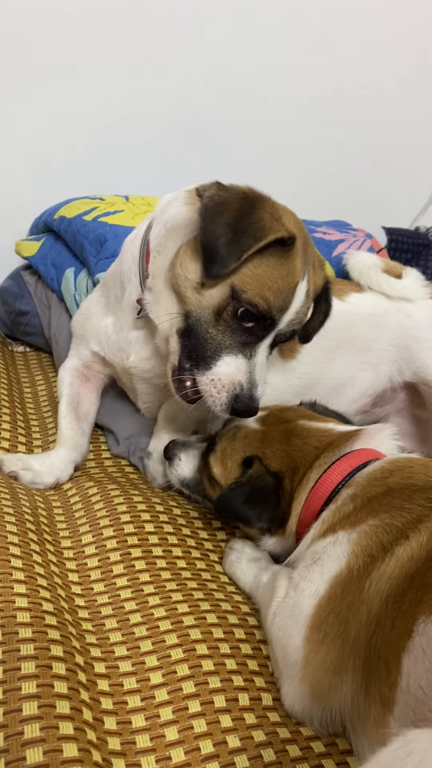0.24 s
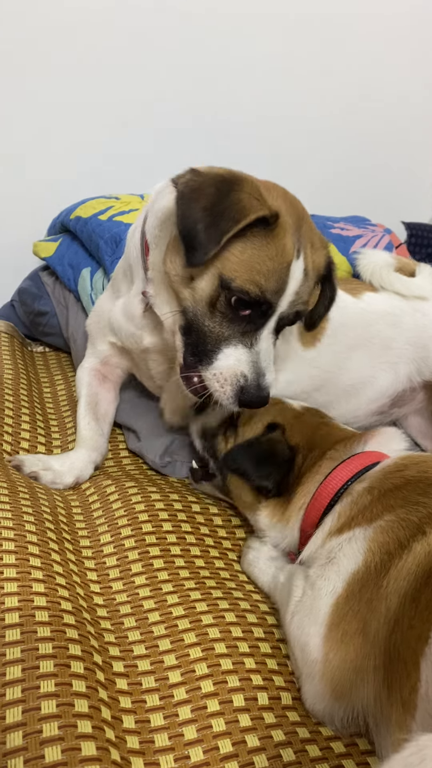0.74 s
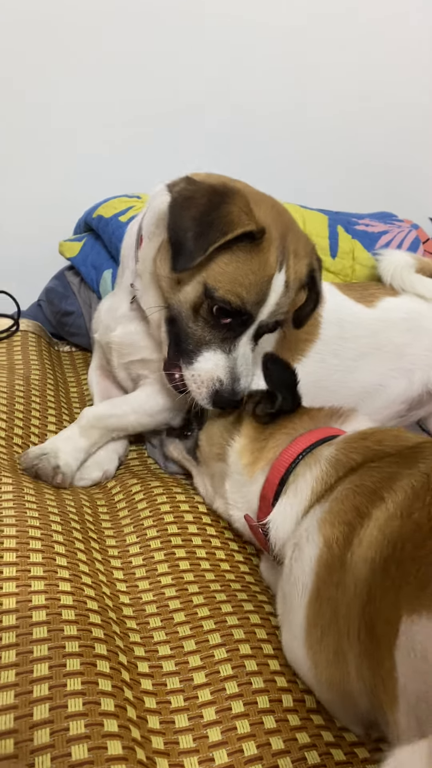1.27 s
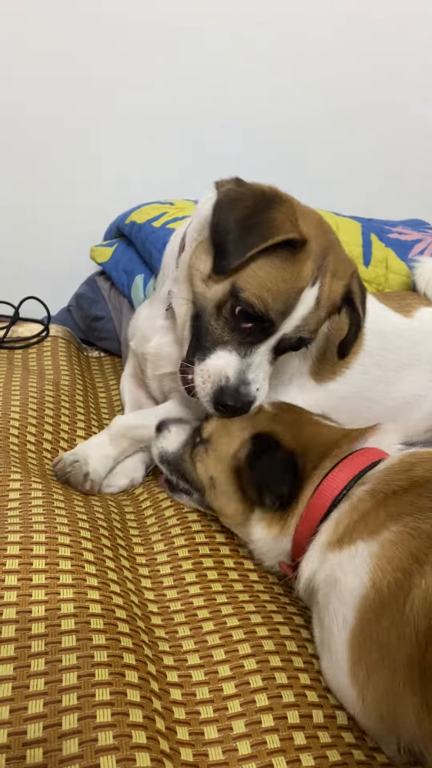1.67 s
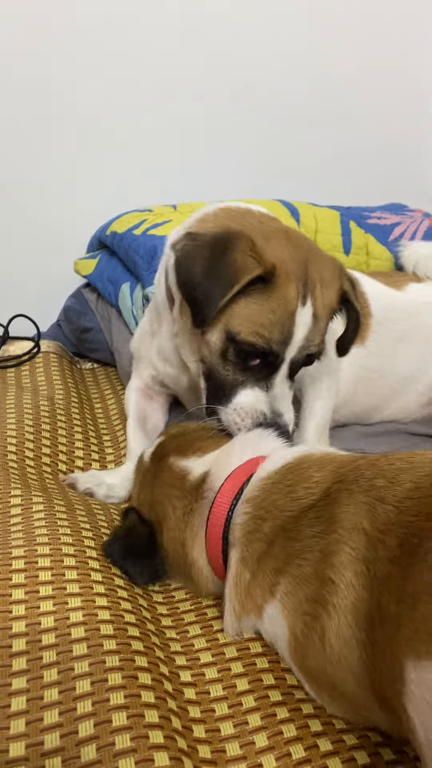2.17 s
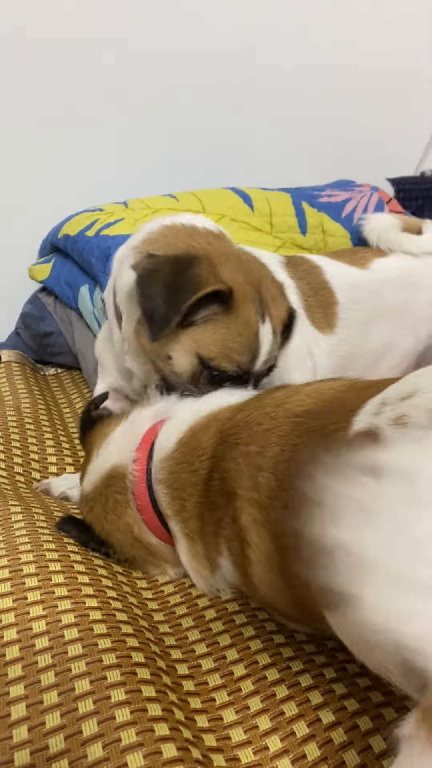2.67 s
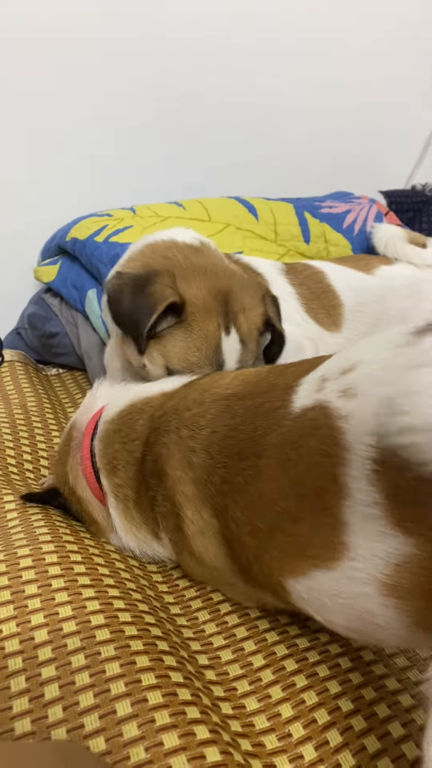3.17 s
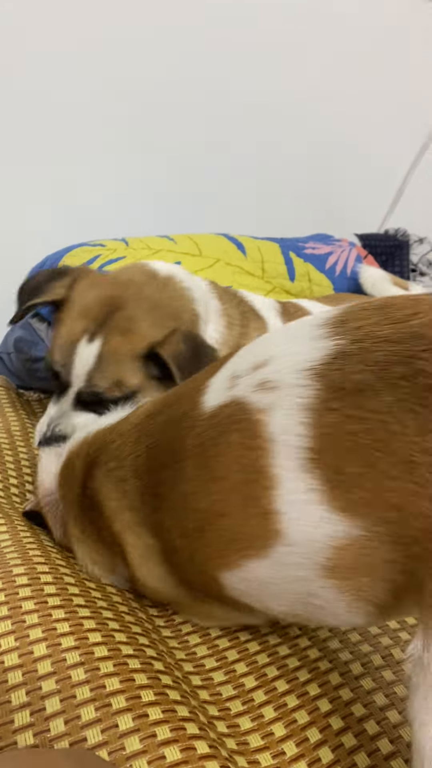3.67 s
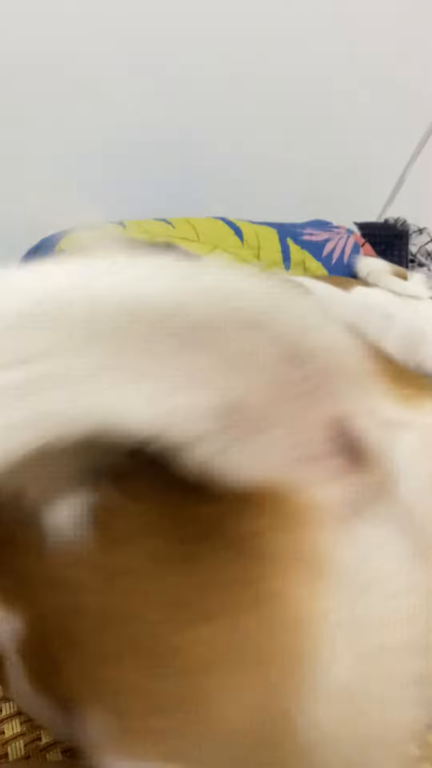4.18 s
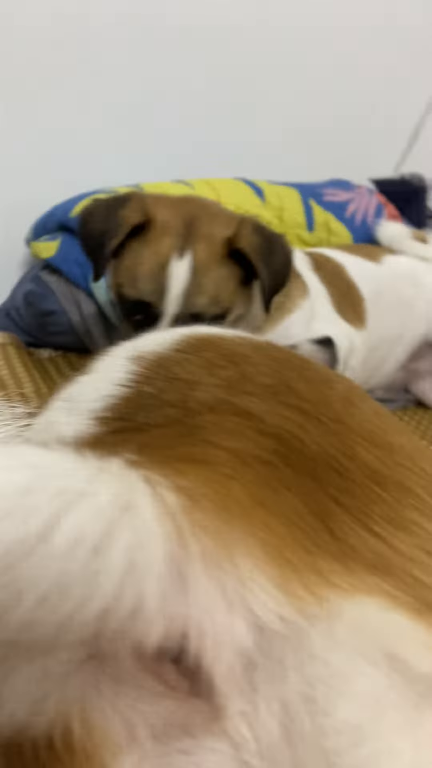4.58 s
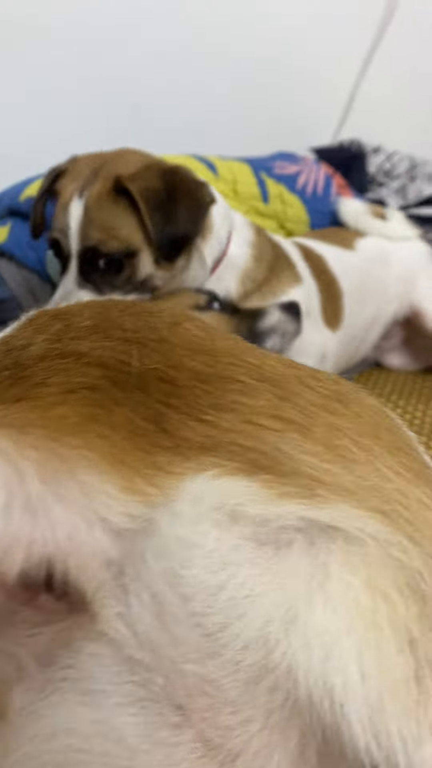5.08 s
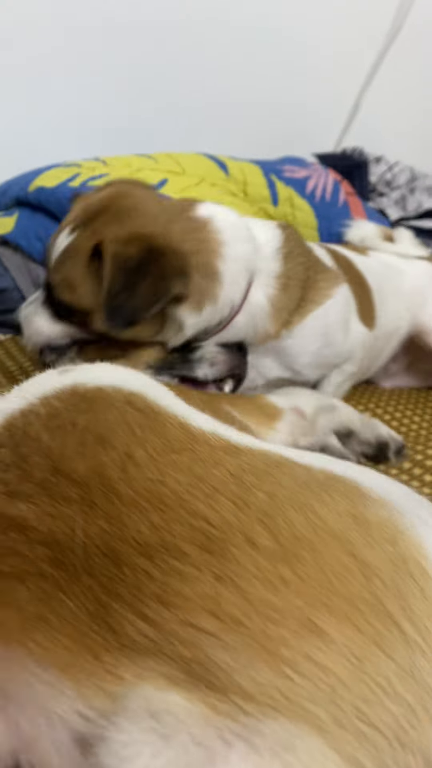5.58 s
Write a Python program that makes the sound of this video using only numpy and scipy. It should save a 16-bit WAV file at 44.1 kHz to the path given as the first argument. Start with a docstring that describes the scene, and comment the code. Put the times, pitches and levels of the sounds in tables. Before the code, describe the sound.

A close stereo scene in a small room: two little dogs wrestle on a bed covered by a woven mat, with a faint fan rush and wavering motor whine behind, the whine sinking away after 3 s. From 0 to 1.2 s come short, breathy huffs and fluttering snorts, strongest near 0.75 s, among dull mattress bumps. At 1.6 s a firm low thump lands with a dry clack and scuff. Two raspy snarls with low, muffled growls follow, at about 2.0-2.1 s and a sharper, snort-broken one at 2.3-2.4 s, then a small huff at 2.6 s. A weak growl murmurs near 3.1 s amid brushing fur and soft scrapes. Slaps at 4.0 s lead to the loudest event at 4.2-4.3 s: deep body thumps, a hard slap and rough scrape, then a brief woody creak at 4.4 s. Faint nose air, light pats and a snorting huff at 5.4 s close it.

```python
"""Dogs play-fighting on a bed

Two small dogs scuffle on a bed with a woven mat, in a small room, close to the microphone.
Huffs, snorts and snarls are noise through resonances of mouth and muzzle; growls are vocal-fold pulses.
Paws and bodies thud as swung pulses and ringing modes; mat, fur and bedding scuff as filtered noise.
The frame creaks and knocks, the mattress rumbles, and a fan of noise and wavering tones hums behind."""
import sys
import numpy as np
from scipy import signal
from scipy.fft import rfft, irfft
from scipy.io import wavfile

SR = 44100
rng = np.random.default_rng(int(sys.argv[2]) if len(sys.argv) > 2 else 0)


def transcribe(signal):
    """Save signal, clipped to [-1, 1], as a 16-bit WAV file at the path in sys.argv[1]."""
    frames = np.atleast_2d(signal).T
    limited = np.clip(frames, -1, 1)
    pcm = np.round(limited * 32767).astype(np.int16)
    wavfile.write(sys.argv[1], SR, pcm)


N = 257544
TIME, BINS = np.arange(N) / SR, np.fft.rfftfreq(N, 1 / SR)
LEAD_S = 0.04  # time from the start of a burst to its crest

# resonances of the muzzle: (frequency [Hz], width [Hz], level [dB])
MUZZLE_MODES = [(658, 58, 0), (940, 110, -3.5), (1286, 120, -2.5), (1840, 220, -7.5), (2195, 133, -4.5),
                (2830, 260, -17), (3410, 490, -20)]
# hiss resonances of the nostrils: (frequency [Hz], width [Hz], level [dB])
NOSE_MODES = [(5030, 880, 9.5), (5770, 370, -2), (8250, 1250, 3.5)]
# spectrum of a scrape on the mat: (frequency [Hz], density [dB per Hz])
SCRAPE_SPECTRUM = [(150, 4.5), (330, 4), (650, 6.5), (1100, -4.5), (2200, -9.5), (3500, -19), (7000, -26)]
# spectrum of the bright fizz of the weave: (frequency [Hz], density [dB per Hz])
FIZZ_SPECTRUM = [(800, -34), (2500, -27), (4000, 4), (5500, 5), (7000, 5), (10000, 3), (13000, -5),
                 (16000, -10)]
# stereo likeness of the room and the mattress: (frequency [Hz], left-right likeness [-1 to 1])
ROOM_LIKENESS = [(50, 0.94), (120, 0), (250, 0.43), (700, 0), (1500, 0.53), (3000, 0.41), (6000, 1)]


def amp(db):
    """Decibels to gain."""
    return 10 ** (np.asarray(db) / 20)


def unit(x):
    """Scales to rms 1."""
    return x / np.sqrt(np.mean(x ** 2) + 1e-20)


def read(points, hz):
    """Reads a table on a log-frequency axis."""
    f, value = np.transpose(points)
    return np.interp(np.log(hz + 1), np.log(f + 1), value)


def colour(x, spectrum):
    """Filters by a spectrum in dB, to rms 1."""
    return unit(irfft(rfft(x) * amp(read(spectrum, BINS)), N))


def band(x, low_hz, high_hz):
    """Causal band-pass, to rms 1."""
    edges = [low_hz, min(high_hz, 0.45 * SR)]
    return unit(signal.sosfilt(signal.butter(2, edges, "band", fs=SR, output="sos"), x))


def noise():
    """White noise for the whole scene."""
    return rng.standard_normal(N)


def wander(rate_hz):
    """Random motion of rms 1, mostly slower than rate_hz."""
    return unit(irfft(rfft(noise()) * np.exp(-(BINS / rate_hz) ** 2), N))


def add(mix, s, sound):
    """Mixes a sound in at time s."""
    part = mix[max(round(s * SR), 0):][:len(sound)]
    part += sound[:len(part)]


def swell(t, peak_s):
    """Rises to 1 at peak_s and dies away."""
    u = np.maximum(t, 0) / peak_s
    return u * np.exp(1 - u)


def arch(t, rise_s, fade_s):
    """A smooth bell with its crest of 1 at t = 0 and separate rise and fade."""
    return np.exp(-np.minimum((t / np.where(t < 0, rise_s, fade_s)) ** 2, 60))


def ring(modes, t):
    """Sum of dying sine modes."""
    return sum(amp(db - 60 * t / t60) * np.sin(2 * np.pi * hz * t) for hz, db, t60 in modes)


def strike(modes, t):
    """A body's answer to one tap, with peak 1."""
    answer = ring(modes, t)
    return answer / abs(answer).max()


def cavity(modes, hz):
    """Gain of a set of steep resonances."""
    return sum(amp(db) / (1 + (2 * (hz - centre) / width) ** 2) for centre, width, db in modes)


def resonate(x, hz, width_hz):
    """A steep resonance that follows the curve hz, to rms 1."""
    turn = np.exp(2j * np.pi * np.cumsum(hz) / SR)
    r = np.exp(-np.pi * width_hz / SR)
    # shift the resonance down to 0 Hz, smooth there, shift back
    smoothed = signal.lfilter([1], [1, -2 * r, r * r], x / turn)
    return unit((turn * smoothed).real)


def burst(gain, rise_s, fade_s):
    """A short puff of noise with the spectrum gain(hz), scaled to rms 1 at its crest, LEAD_S after its start."""
    t = TIME[:4096]
    shape = arch(t - LEAD_S, rise_s, fade_s)
    hiss = irfft(rfft(rng.standard_normal(len(t))) * gain(np.fft.rfftfreq(len(t), 1 / SR)))
    puff = shape * hiss
    return puff * np.linalg.norm(shape) / np.linalg.norm(puff)


def pair(a, b, likeness):
    """Two unrelated sounds become a left and a right that are partly alike."""
    same = np.clip(read(likeness, BINS), -1, 1)
    mid = rfft(a, N) * np.sqrt((1 + same) / 2)
    side = rfft(b, N) * np.sqrt((1 - same) / 2)
    return irfft([mid + side, mid - side], N)


def room_response():
    """Sparse reflections of a small room, each band dying at its own speed."""
    # decay of the room: (frequency [Hz], t60 [s])
    decay = [(60, 0.44), (150, 0.18), (500, 0.27), (2000, 0.24), (5000, 0.17), (12000, 0.16)]
    size = SR // 2
    taps = rng.choice([-1., 1.], (2, size)) * (rng.random((2, size)) < 4000 / SR)  # 4000 per second
    hz, t, z = signal.stft(taps, SR, nperseg=256)
    faded = z * amp(-60 * t / read(decay, hz)[:, None])
    tail = signal.istft(faded, SR, nperseg=256)[1][:, :size]
    tail = tail * np.clip(TIME[:size] / 0.005 - 0.5, 0, 1)  # silent for the first 2.5 ms
    return pair(*tail / np.linalg.norm(tail[0]), ROOM_LIKENESS)[:, :size]


def place(x, room, wet_db, pan_db=None):
    """Direct sound, centred or leaning to one side, plus the room."""
    lean = 1 if pan_db is None else amp([[pan_db / 2], [-pan_db / 2]])
    return x * lean + amp(wet_db) * signal.fftconvolve(x[None], room, axes=1)[:, :N]


def fan(rush_db=-41.5, tone_trim_db=4.0, waver=0.00456, whirr_db=-57, hiss_db=-68):
    """Steady rush of air with a hollow drone, a wavering motor whine and a thin hiss."""
    # spectrum of the rush: (frequency [Hz], density [dB per Hz])
    rush_spectrum = [(15, -54), (25, -7.5), (55, -11.5), (86, -4.5), (129, -14), (233, -5), (359, -7.5),
                     (919, -16.5), (1110, -17), (1240, -22.5), (5010, -37.5), (6550, -41), (7300, -53),
                     (9050, -38), (15500, -126)]
    # stereo likeness of the rush: (frequency [Hz], left-right likeness [-1 to 1])
    rush_likeness = [(40, 0.67), (100, -0.44), (200, -0.87), (450, -1.11), (750, 0.14), (1100, -0.67),
                     (1600, 0.22), (2200, 0.41), (3000, 0.077), (5000, 1), (8000, 1)]
    # hollow drone bands: (centre [Hz], width [Hz], level [dB])
    drone_bands = [(350, 58, -55.5), (740, 91, -61.5)]
    # motor whine: (frequency [Hz], level [dB before the trim])
    whine_tones = [(985.1, -62.5), (1109, -64)]
    sink_after_s, sink_db_per_s = 3, 5.5

    rush = pair(colour(noise(), rush_spectrum), colour(noise(), rush_spectrum), rush_likeness)
    drone = sum(amp(db) * band(noise(), hz - width / 2, hz + width / 2) for hz, width, db in drone_bands)
    tones = 0
    for hz, db in whine_tones:
        turns = np.cumsum(hz * (1 + waver * wander(28.9))) / SR
        tones = tones + amp(db) * unit(np.sin(2 * np.pi * turns))
    whirr = band(noise(), 945, 1350)  # rush of air around the whine
    whine = amp(tone_trim_db) * tones + amp(whirr_db) * whirr
    whine = whine * amp(-sink_db_per_s * np.maximum(TIME - sink_after_s, 0))
    return amp(rush_db) * rush + drone + whine + amp(hiss_db) * band(noise(), 9400, 14100)


def heave(trim_db=2, lumps_db=6.0):
    """Lumpy low rumble of the mattress under shifting weight."""
    # how hard the mattress heaves: (time [s], level [dB before trim and lumps])
    effort_curve = [(0.0, -31.5), (0.1, -36), (0.8, -38.5), (1.19, -40.5), (1.55, -36), (1.64, -28.5),
                    (1.76, -37.5), (2.44, -39), (2.8, -47.5), (3.1, -40), (3.27, -41), (3.5, -33.5),
                    (3.65, -43), (4.1, -38), (4.33, -29.5), (4.75, -43.5), (5.32, -44.5), (5.84, -40)]
    # spectrum of the mattress: (frequency [Hz], density [dB per Hz])
    mattress_spectrum = [(15, -12), (30, -6), (55, 2), (75, 2), (95, -2.5), (125, 5.5), (160, -4.5),
                         (220, -14.5), (400, -19), (900, -74)]
    rumble = pair(colour(noise(), mattress_spectrum), colour(noise(), mattress_spectrum), ROOM_LIKENESS)
    lumps = lumps_db * np.tanh(wander(5.3))
    return amp(trim_db + np.interp(TIME, *np.transpose(effort_curve)) + lumps) * rumble


def fur(swing_db=1.5, swing_hz=9):
    """The two coats brush against each other in a smooth, soft rush."""
    # how hard the coats rub: (time [s], level [dB before the swing])
    rubbing = [(0, -59.5), (2.3, -56.5), (2.7, -56), (3.7, -57), (4.7, -57.5), (5.3, -60), (5.84, -59)]
    # coat brushing on coat: (frequency [Hz], width [Hz], level [dB])
    coat_modes = [(1563, 560, 2.5), (2410, 1140, -0.5)]
    level_db = np.interp(TIME, *np.transpose(rubbing)) + swing_db * wander(swing_hz)
    return amp(level_db) * unit(irfft(rfft(noise()) * cavity(coat_modes, BINS), N))


def rustles(rustle_db=-55, spread_db=3, width_share=0.58, bouts_db=3, bouts_hz=5):
    """Fur, collars and bedding rub here and there in loose bouts, each time at another pitch."""
    rubs_per_s, pitch_range_hz, fade_range_s = 30, (340, 815), (0.012, 0.031)
    out = np.zeros(N)
    rubs = rng.random(size=(400, 4))[:round(rubs_per_s * N / SR)]
    for when, pitch, length, strength in rubs:
        centre = np.exp(np.interp(pitch, [0, 1], np.log(pitch_range_hz)))
        fade_s = np.interp(length ** 2, [0, 1], fade_range_s)  # squared: mostly short
        rub = burst(lambda hz: cavity([(centre, width_share * centre, 0)], hz), fade_s / 2, fade_s)
        level_db = rustle_db + spread_db * (2 * strength - pitch)  # higher rubs are softer
        add(out, when * N / SR - LEAD_S, amp(level_db) * rub)
    return out * amp(bouts_db * np.tanh(wander(bouts_hz)))


def slides(scrape_trim_db=-14, fizz_trim_db=-12, stir_db=-56, stir_swing_db=4, slips_per_s=3500, spread_db=3.0):
    """Fur and claws catch on the weave in a dense run of tiny slips; the dogs never lie quite still."""
    # slides over the mat; the first row is the soft swell of the opening huff:
    # (crest [s], level [dB before trim], fizz re the scrape [dB before trim], half length [s])
    strokes = [(0.082, -38, -25, 0.031), (0.76, -35, -28, 0.026), (1.568, -33.5, -6, 0.035),
               (2.665, -64, 13, 0.076), (2.93, -43, -35, 0.032), (3.095, -41, -32, 0.063),
               (3.467, -39.5, -30, 0.067), (4.013, -24.5, -37, 0.052), (4.062, -51.5, 8, 0.038),
               (4.099, -47, 13.5, .002), (4.157, -51.5, 9, .022), (4.22, -39, -42, 0.019),
               (4.245, -39, -3, 0.014), (4.265, -18.5, -19, 0.013), (4.398, -29, -10.5, 0.066),
               (5.083, -42.5, -8, 0.057), (5.306, -35.5, -41, .04), (5.48, -53.5, 3.5, 0.16),
               (5.684, -45, -37, 0.034)]
    strength = amp(spread_db * np.minimum(rng.exponential(1, N), 4))
    slips = noise() * (rng.random(N) < slips_per_s / SR) * strength
    scrape, fizz = np.zeros(N), np.zeros(N)
    for s, db, treble_db, half_s in strokes:
        stroke = amp(db) * arch(TIME - s, half_s, half_s)
        scrape += amp(scrape_trim_db) * stroke
        fizz += amp(treble_db + fizz_trim_db) * stroke
    stir = amp(stir_db + stir_swing_db * wander(47))
    rough = (scrape + stir) * colour(slips, SCRAPE_SPECTRUM)
    return rough + fizz * colour(unit(slips) + noise(), FIZZ_SPECTRUM)


def creaks(grit_db=-20, slip_s=0.00092):
    """The frame catches and lets go: a few hard slips ring the wood, then small ones chatter."""
    # hard slips of the frame: (time [s], level [dB])
    hard_slips = [(4.373, -22), (4.3762, -17), (4.389, -26)]
    # modes of the frame: (frequency [Hz], level [dB], t60 [s])
    frame_modes = [(1620, 0, .035), (1880, 1, .042), (2010, -5, .025), (2630, -9, .022)]
    # where the chatter is strongest: (frequency [Hz], width [Hz], level [dB])
    chatter_modes = [(1850, 390, -1.5), (2640, 400, -7), (3300, 420, -5)]
    chatter_per_s, chatter_db, chatter_rise_s, chatter_fade_s = 1200, -39.5, 0.013, 0.06

    out, t = np.zeros(N), TIME[:SR // 5]
    wood = strike(frame_modes, t) * (1 - np.exp(-t / slip_s))
    for s, db in hard_slips:
        grit = amp(grit_db) * swell(t, slip_s) * rng.standard_normal(len(t))
        add(out, s, amp(db) * (wood + grit))
    small_slips = noise() * (rng.random(N) < chatter_per_s / SR)
    chatter = unit(irfft(rfft(small_slips) * cavity(chatter_modes, BINS), N))
    since = np.maximum(TIME - hard_slips[0][0], 0)
    weakening = np.minimum(since / chatter_rise_s, 1) * np.exp(-since / chatter_fade_s)
    return out + amp(chatter_db) * weakening * chatter


def knocks(rise_s=0.0012, fade_s=0.0015):
    """Hard parts of the bed clack together without ringing."""
    # clacks: (crest [s], level [dB])
    clacks = [(1.597, -34.5), (1.6065, -29.5), (1.6092, -28)]
    # spectrum of a clack: (frequency [Hz], density [dB per Hz])
    clack_spectrum = [(300, -25), (700, -19), (1500, -3), (2250, 4.5), (2800, -12.5), (6000, -20),
                      (12000, -22)]
    out = np.zeros(N)
    for s, db in clacks:
        clack = burst(lambda hz: amp(read(clack_spectrum, hz)), rise_s, fade_s)
        add(out, s - LEAD_S, amp(db) * clack)
    return out


def slaps(pat_db=-3, scuff_db=-12, scuff_s=0.003, tick_db=-27, tick_s=0.0017):
    """A dull pat of the pad, a short scuff and a dry tick of the woven strips."""
    # claws and paws slapping the mat: (time [s], level [dB before the trim of each part])
    hits = [(0.376, -34), (1.577, -30), (3.981, -23.5), (4.049, -21), (4.273, -11.5), (4.277, -26),
            (4.379, -19.5), (4.913, -29.5), (5.271, -31), (5.461, -29), (5.594, -25.5)]
    # what mat and padding ring with under a paw: (frequency [Hz], level [dB], t60 [s])
    mat_modes = [(190, -1.5, 0.043), (323, 2.5, 0.084), (555, 6.5, 0.034), (890, 6, 0.0053),
                 (1700, 7, 0.003)]
    pats, mat = np.zeros(N), strike(mat_modes, TIME[:SR // 20])
    for s, db in hits:
        add(pats, s, amp(db + pat_db) * mat)
    scuff = sum(amp(db + scuff_db) * swell(TIME - s, scuff_s) for s, db in hits)
    tick = sum(amp(db + tick_db) * swell(TIME - s, tick_s) for s, db in hits)
    return pats + scuff * colour(noise(), SCRAPE_SPECTRUM) + tick * colour(noise(), FIZZ_SPECTRUM)


def press(db, hz, cycles, overtone=2.1, stiffening=0.44):
    """One push into the mattress; the padding stiffens when pressed hard, so heavy ones gain an overtone."""
    t = TIME[:SR // 2]
    force = amp(db) * swell(t, cycles / hz)
    turn = 2 * np.pi * hz * t
    return force * (np.sin(turn) + stiffening * force * np.sin(overtone * turn))


def thumps(puff_db=-20, puff_s=0.0061, ring_db=-6):
    """Each landing pushes the mattress, puffs the cloth and sets the bed swinging; then the weight settles."""
    # landings of paws and bodies: (time [s], level [dB], pitch [Hz], settling weight re the landing [dB])
    landings = [(0.124, -20.5, 75, -9), (0.137, -21.5, 141, -23), (0.413, -21, 83, -27),
                (0.452, -20.5, 91, -18), (0.662, -20, 85, -7), (0.687, -23.5, 133, 5.5),
                (0.733, -21.5, 130, -15), (1.582, -18.5, 227, -33), (1.588, -10.5, 82, -6),
                (1.59, -15.5, 366, -27), (1.598, -15.5, 159, -30), (1.669, -16.5, 77, -24),
                (2.051, -21.5, 134, -16), (2.57, -20.5, 150, -35), (2.579, -21.5, 90, -32),
                (3.466, -22, 136, -1), (3.502, -18, 141, -36), (4.194, -9, 82, -9), (4.197, -19, 378, -30),
                (4.209, -23, 476, -30), (4.204, -11.5, 149, -28), (4.216, -10, 65, -6),
                (4.386, -23.5, 129, -5), (4.398, -23, 80, -12), (4.408, -20.5, 392, -30),
                (4.916, -26, 128, -6.5), (5.529, -25, 71.6, -28), (5.61, -18, 268, -35),
                (5.719, -26, 246, -24)]
    # what the bed swings with: (frequency [Hz], level [dB], t60 [s])
    bed_modes = [(69, 33, 0.24), (110, 15, 0.22), (158, 36, 0.24), (204, 19, 0.1), (339, 26, .2),
                 (393.5, 34.5, 0.3)]
    landing_cycles = 0.45  # the push crests after this part of a cycle
    settle_s, settle_hz, settle_cycles = 0.06, 69.8, 0.65  # the weight sinks in just after the paws

    push, puff = np.zeros(N), np.zeros(N)
    for s, db, hz, settle_db in landings:
        add(push, s, press(db, hz, landing_cycles))
        add(push, s + settle_s, press(db + settle_db, settle_hz, settle_cycles))
        add(puff, s, amp(db) * swell(TIME[:SR // 2], puff_s))
    cloth = band(band(noise(), 140, 424), 140, 424)  # twice, for steeper slopes
    blow = push + amp(puff_db) * puff * cloth
    bed = ring(bed_modes, TIME[:2 * SR])
    swing = signal.fftconvolve(blow, bed / abs(rfft(bed)).max())[:N]
    return blow + amp(ring_db) * swing


def growls(trim_db=-3.5, jitter=0.2547, shimmer_db=2.5):
    """Uneven pulses of the vocal folds, rising in pitch and muffled by a nearly shut mouth."""
    # low growls: (crest [s], level [dB before trim], pitch at the crest before jitter [Hz])
    voicings = [(2.085, -27, 120), (2.357, -27.5, 112), (3.085, -34.5, 153)]
    rise_s, fade_s, glide_octaves_per_s = 0.03, 0.036, 2.5
    out, unsteady = np.zeros(N), 1 + jitter * wander(86.8)
    for s, db, hz in voicings:
        pitch = hz * 2 ** (glide_octaves_per_s * np.clip(TIME - s, -rise_s, fade_s))
        turns = np.cumsum(pitch * unsteady) / SR
        # only three harmonics, falling steeply: the muffling
        folds = sum(np.cos(2 * np.pi * k * turns) / k ** 1.57 for k in range(1, 4))
        out += amp(db + trim_db) * arch(TIME - s, rise_s, fade_s) * unit(folds)
    return out * unit(amp(shimmer_db * wander(54)))


def airflow(modes):
    """Half a second of air through cavities, to rms 1."""
    size = SR // 2
    gain = cavity(modes, np.fft.rfftfreq(size, 1 / SR))
    return unit(irfft(rfft(rng.standard_normal(size)) * gain, size))


def lips(flutter_db, flutter_hz, rasp_hz, rasp):
    """Loose lips make the air pulse unevenly."""
    turns = np.cumsum(rasp_hz * (1 + 0.33 * wander(57))) / SR
    flutter = amp(flutter_db * np.tanh(wander(flutter_hz)))
    return unit(flutter * np.exp(rasp * np.cos(2 * np.pi * turns)))


def effort(s, start, crest, end):
    """Gain of a snarl at times s: a quick start, a build to the crest, a hold and a release."""
    build_range_db, attack_s, release_db_per_s = 8.5, 0.003, 285
    build_db = build_range_db * np.clip((s - crest) / (crest - start), -1, 0)
    release_db = release_db_per_s * np.maximum(s - end, 0)
    return np.clip((s - start) / attack_s + 1, 0, 1) * amp(build_db - release_db)


def snarls(muzzle_db=-15, mouth_db=-14, mouth_width_hz=130, nose_trim_db=-9):
    """Rasping air swells while the opening jaw pulls the mouth resonance upward."""
    # snarls: (start [s], crest [s], end of the hold [s], level [dB before the trim of each part],
    # nose hiss [dB before trim], mouth resonance at the crest [Hz], throat re the level [dB])
    breaths = [(1.9688, 2.088, 2.12, -28.5, -44, 1170, -12.5), (2.311, 2.386, 2.395, -26, -45, 1383, -17.5)]
    # low resonances of the throat: (frequency [Hz], width [Hz], level [dB])
    throat_modes = [(198, 68, 7.5), (322, 34, -2.5)]
    jaw_octaves_per_s = 2.6  # the mouth opens all through a snarl
    out = np.zeros(N)
    for start, crest, end, db, hiss_db, mouth_hz, throat_db in breaths:
        s = start + TIME[:SR // 2]
        mouth_curve_hz = mouth_hz * 2 ** (jaw_octaves_per_s * (s - crest))
        mouth = resonate(rng.standard_normal(len(s)), mouth_curve_hz, mouth_width_hz)
        air = amp(muzzle_db) * airflow(MUZZLE_MODES) + amp(mouth_db) * mouth
        air = air + amp(throat_db) * airflow(throat_modes)
        hiss = amp(hiss_db + nose_trim_db) * airflow(NOSE_MODES)
        add(out, start, effort(s, start, crest, end) * (amp(db) * air + hiss))
    return out * lips(flutter_db=2.5, flutter_hz=70, rasp_hz=62, rasp=0.85)


def flap(mouth_hz, mouth_db=3, mouth_width_hz=300, rise_s=0.0011, fade_s=0.0029,
         ring_db=-6, ring_width_hz=90, ring_s=0.014, muzzle_db=-9):
    """The palate opens once and lets a burst of air through the muzzle; mouth and muzzle ring on."""
    passage = MUZZLE_MODES + [(mouth_hz, mouth_width_hz, mouth_db)]
    air = burst(lambda hz: cavity(passage, hz), rise_s, fade_s)
    mouth = burst(lambda hz: cavity([(mouth_hz, ring_width_hz, 0)], hz), rise_s, ring_s)
    muzzle = burst(lambda hz: cavity(MUZZLE_MODES, hz) ** 2, rise_s, ring_s)
    return air + amp(ring_db) * mouth + amp(muzzle_db) * muzzle


def snorts():
    """Hard flaps of the palate break through the huffs and snarls at uneven gaps."""
    # single flaps: (crest [s], level [dB], mouth resonance [Hz])
    flaps = [(0.066, -43, 750), (0.087, -46, 990), (0.1115, -36.5, 1010), (0.299, -47, 1090),
             (0.748, -35.5, 960), (0.763, -35, 1260), (0.93, -45, 1400), (0.963, -36, 1350),
             (1.97, -36, 850), (2.055, -36, 796), (2.099, -36.5, 1980), (2.129, -32.5, 1290),
             (2.299, -36, 1240), (2.322, -34.5, 2100), (2.341, -32.5, 1190), (2.351, -36, 1160),
             (2.364, -32, 2140), (2.378, -26, 1564), (2.39, -28.5, 1240), (2.399, -31.5, 1460),
             (2.41, -35, 1370), (2.604, -45, 2020), (5.396, -39, 1580)]
    out = np.zeros(N)
    for s, db, mouth_hz in flaps:
        add(out, s - LEAD_S, amp(db) * flap(mouth_hz))
    return out


def huffs(mouth_trim_db=-10, nose_trim_db=-9, mouth_width_hz=330, lip_width_hz=420,
          opening_octaves_per_s=1.6, tremble_octaves=0.056):
    """Air through throat, mouth, lips and nostrils swells and fades about evenly; the jaw opens and trembles."""
    # puffs of air: (start [s], time to the crest [s], mouth [dB before trim], nose hiss [dB before trim],
    # mouth resonance [Hz], throat re the mouth [dB], lip resonance [Hz], lips re the mouth [dB]);
    # both resonances are at the crest, before the tremble
    puffs = [(0.02, 0.047, -38.5, -45.5, 890, 2, 2300, -17), (0.1079, 0.012, -37, -66, 1140, -2, 2200, -19),
             (0.289, 0.025, -38.5, -45.5, 1320, 4, 2180, 2.5),
             (0.487, 0.029, -35.5, -45.5, 1390, 2, 2350, -4),
             (0.709, 0.017, -30.5, -38.5, 1150, -2.5, 2420, -8),
             (0.748, 0.019, -35.5, -36.5, 1240, 4, 2520, -5), (0.921, 0.027, -36, -41, 1370, 2.5, 2130, -3),
             (1.128, .015, -44, -46.5, 1170, -5, 2200, -10), (2.579, 0.019, -37, -61, 1380, -3, 1950, -0.5),
             (4.582, 0.027, -64, -48, 1370, -3, 2200, -8), (5.36, 0.032, -35.5, -58, 1510, -22, 2090, -1)]
    # resonances of the open throat: (frequency [Hz], width [Hz], level [dB])
    pharynx_modes = [(652, 250, 0.5), (980, 270, -2.5), (2670, 200, -19), (3340, 140, -14)]
    fade_share = 1.08  # fade time over rise time
    out, t = np.zeros(N), TIME[:SR // 2]
    tremble = tremble_octaves * wander(28)
    for s, rise_s, db, hiss_db, mouth_hz, throat_db, lip_hz, lip_db in puffs:
        early = max(s - rise_s, 0)  # leaves room for the foot of the rise
        since_crest = early + t - s - rise_s
        jaw = 2 ** (opening_octaves_per_s * since_crest + np.interp(early + t, TIME, tremble))
        mouth = resonate(rng.standard_normal(len(t)), mouth_hz * jaw, mouth_width_hz)
        lip = resonate(rng.standard_normal(len(t)), lip_hz * jaw, lip_width_hz)
        air = mouth + amp(throat_db) * airflow(pharynx_modes) + amp(lip_db) * lip
        hiss = amp(hiss_db + nose_trim_db) * airflow(NOSE_MODES)
        breath = arch(since_crest, rise_s, fade_share * rise_s)
        add(out, early, (amp(db + mouth_trim_db) * air + hiss) * breath)
    return out * lips(flutter_db=4, flutter_hz=110, rasp_hz=120, rasp=0.55)


def scene():
    """Fan, bed and dogs together in the room."""
    room = room_response()
    bed = place(slides() + rustles() + fur(), room, wet_db=-7.0) + place(creaks(), room, wet_db=-8.0)
    blows = place(knocks(), room, wet_db=-13.0) + place(slaps(), room, wet_db=-19)
    blows = blows + place(thumps(), room, wet_db=-8.5)
    dogs = place(growls(), room, wet_db=1.5) + place(snarls(), room, wet_db=-6.5, pan_db=-2.0)
    dogs = dogs + place(snorts(), room, wet_db=-8.5, pan_db=-5)
    dogs = dogs + place(huffs(), room, wet_db=-13.5, pan_db=-2.0)
    return fan() + heave() + bed + blows + dogs


def record(dry, low_cut_hz=42, edge_hz=15800):
    """The microphone sheds the deepest bass and its two ports turn the phase apart; then the band limit."""
    # phase by which the left port leads the right: (frequency [Hz], phase [rad])
    port_phase = [(0, 0), (1000, -.5), (1600, 0), (2200, .3), (2900, 1.3), (3700, .6), (4400, .8),
                  (5050, .15), (7300, np.pi), (8300, 3.7), (10300, 2 * np.pi), (13600, 3 * np.pi),
                  (16000, 12.3)]
    lead = np.interp(BINS, *np.transpose(port_phase))
    bass_cut = BINS ** 2 / np.sqrt(BINS ** 4 + low_cut_hz ** 4)
    turns = np.exp(0.5j * np.array([lead, -lead]))  # half the lead to each side
    ported = irfft(rfft(dry) * bass_cut * turns, N)
    low_pass = signal.firwin(1023, edge_hz, window=("kaiser", 9), fs=SR)
    return signal.oaconvolve(ported, low_pass[None], "same")


dry = scene()
out = record(dry)
transcribe(out)
```